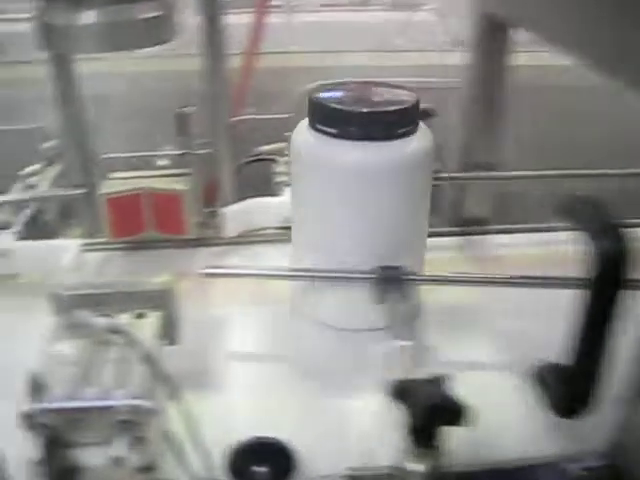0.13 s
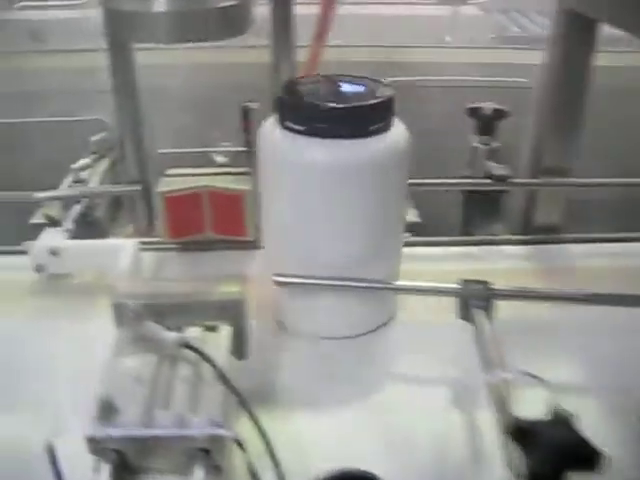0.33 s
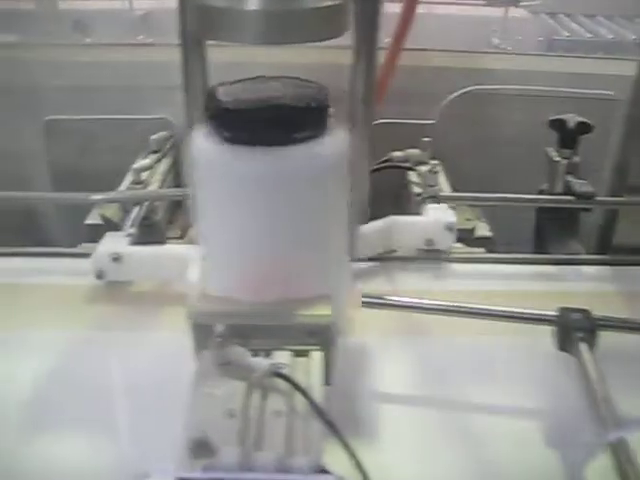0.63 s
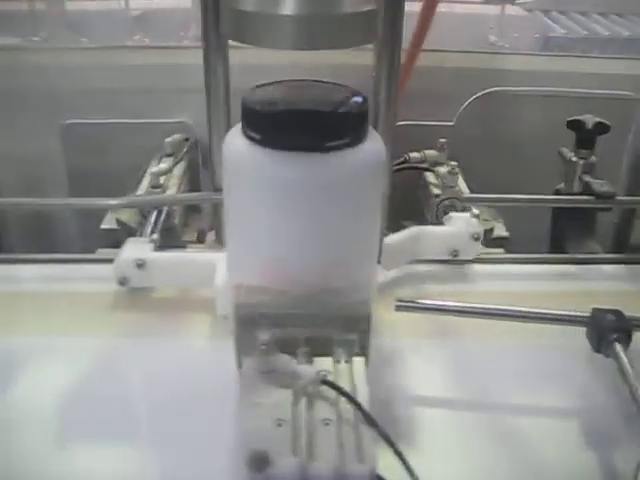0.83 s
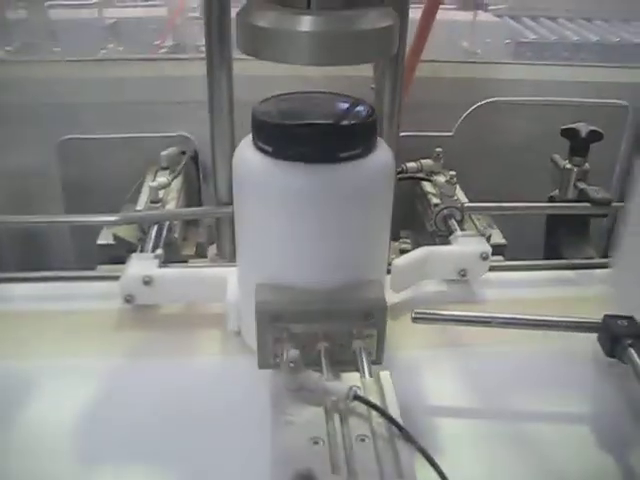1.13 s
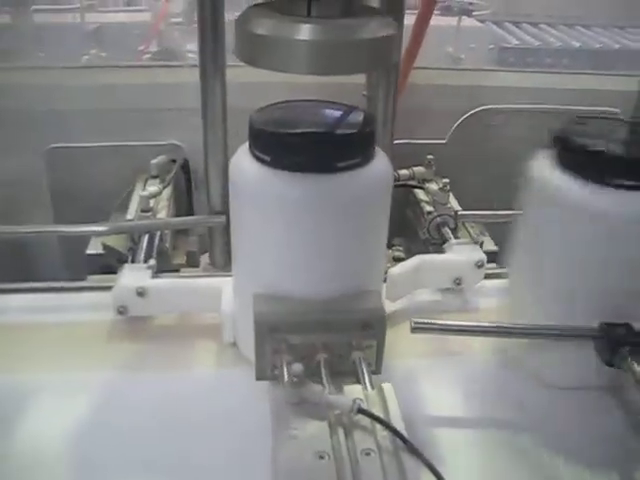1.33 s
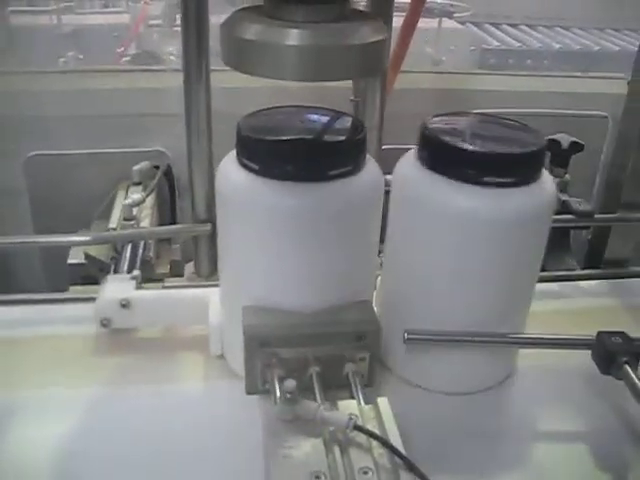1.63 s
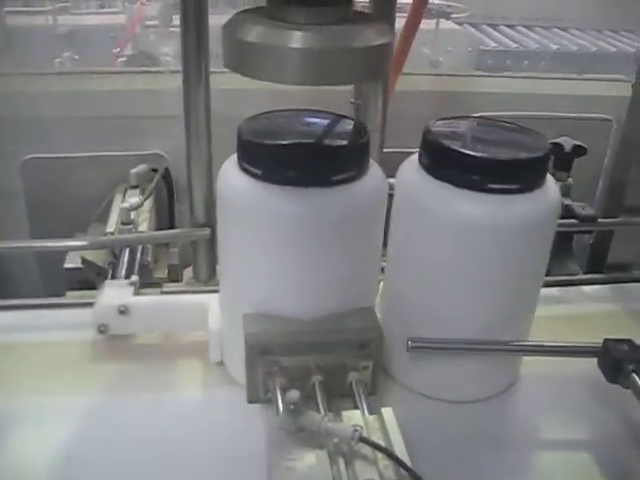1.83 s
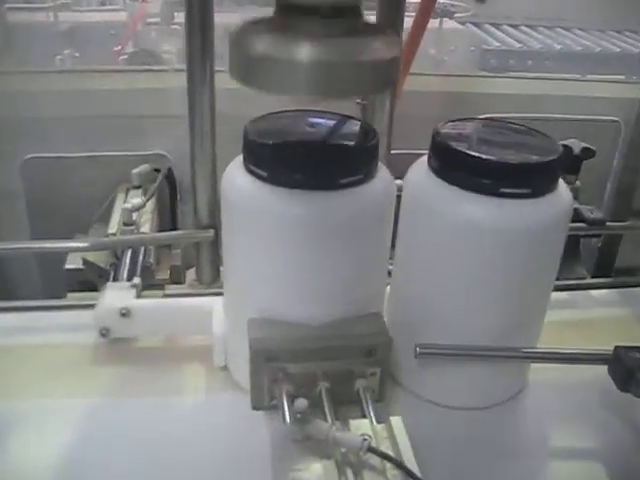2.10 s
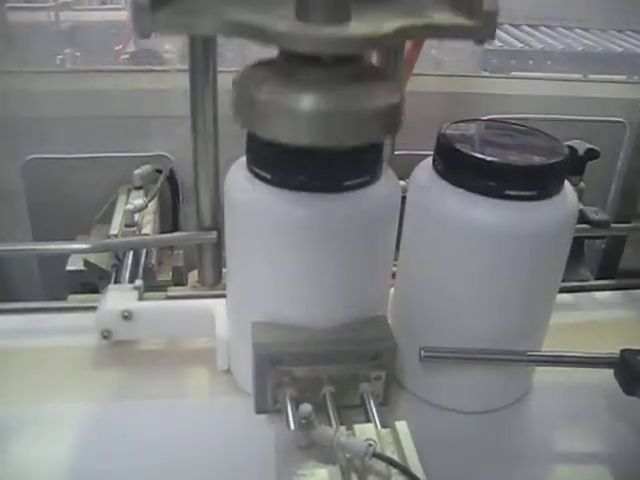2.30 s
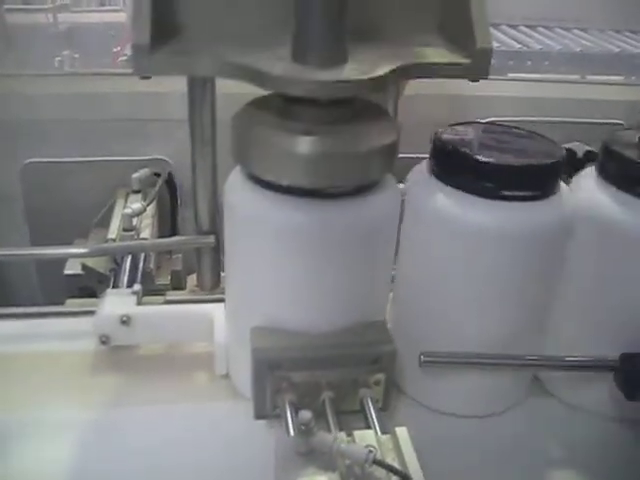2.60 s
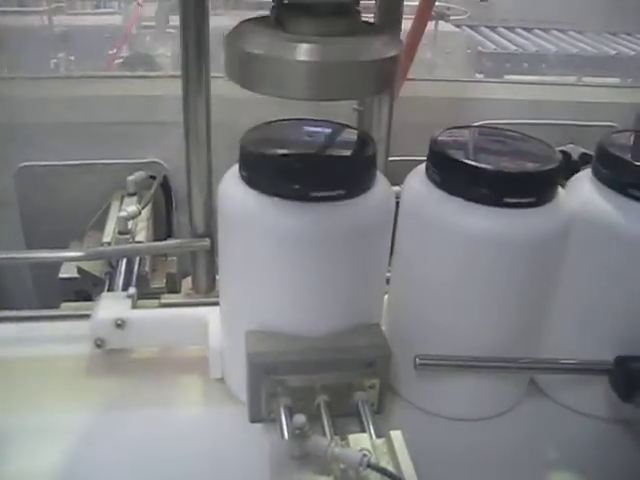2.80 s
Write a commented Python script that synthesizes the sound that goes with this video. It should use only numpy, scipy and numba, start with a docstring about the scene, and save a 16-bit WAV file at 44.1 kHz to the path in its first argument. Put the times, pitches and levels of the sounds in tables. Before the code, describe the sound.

A factory capping machine pops its air valves, whines up to a steady pitch, knocks on a plastic jar lid, grinds down and releases with metal clinks, in a hissing hall, one close camera microphone.

```python
"""In a noisy factory hall, where leaking air hisses throughout, an air-driven capping head closes a jar.
Valves pop as thumps with a spit of air; the vane motor, a stack of sine partials, spins up to a whine.
The head knocks on the lid with ringing modes and grinds it tight, slip pulses ringing the jar and chuck.
The latch clinks, once faintly in the grind and then at the release; the head lifts with a low noise rumble.
One camera microphone with quick gain control and a narrow dead band in its treble hears it all."""
import sys
import numpy as np
from scipy import signal
from scipy.fft import rfft, irfft
from scipy.io import wavfile
from scipy.ndimage import uniform_filter1d
from numba import njit

SR = 44100
rng = np.random.default_rng(int(sys.argv[2]) if len(sys.argv) > 2 else 0)


def waveform_to_disk(signal):
    """Save audio, clipped to [-1, 1], as 16-bit WAV at the path in sys.argv[1]."""
    frames = np.transpose(np.atleast_2d(signal))
    scaled = np.clip(frames, -1, 1) * 32767
    samples = np.round(scaled).astype(np.int16)
    wavfile.write(sys.argv[1], SR, samples)


def level_to_linear(level):
    """Convert decibel levels to linear amplitude factors, elementwise."""
    exponent = np.asarray(level, float) / 20
    return 10 ** exponent


N = 130095  # length in samples

# All levels in the tables are those ahead of the microphone's gain control.
# Hall noise with leaking air. Each row: frequency in Hz, relative level in dB per Hz.
HALL_SPECTRUM = [(25, -17), (60, -16.5), (123, -7.5), (220, -1.5), (350, -4.5), (500, -0.5), (620, -4),
                 (760, 2), (1000, -3.5), (1250, -0.5), (1600, -2), (2600, -2), (5500, -4.5), (7000, -6),
                 (9000, -7), (11500, -2), (13000, -5), (16000, -18.5)]
# Thin wavering whistles. Each row: frequency in Hz, middle level in dB.
WHISTLES = [(2559, -46.5), (8541, -64), (12742, -50)]
# Short faint tones in the hall. Each row: start in seconds, length in seconds, frequency in Hz, level in dB.
PASSING_TONES = [(0.24, 0.18, 750, -32), (1.4, 0.1, 2186, -33.5)]
# Rumble of the lifting head. Each row: time in seconds, level in dB.
LIFT_LEVEL = [(2.74, -60), (2.78, -14), (2.83, -20), (2.88, -19.5), (2.95, -24.5)]
# Colour of that rumble. Each row: frequency in Hz, relative level in dB per Hz.
LIFT_SPECTRUM = [(60, -24), (110, -10), (200, -1), (400, -1), (800, -5), (1500, -11), (4000, -12)]
# Valve pops. Each row: time in seconds, thump level in dB, thump pitch in Hz, spit level in dB,
# spit centre in Hz.
VALVE_POPS = [(0.5165, -9.5, 490, -10, 6700), (0.5204, -8.5, 460, -16.5, 2500),
              (1.518, -8, 378, -9.5, 10500), (1.5187, -9, 450, -12.5, 4000)]
# Head knocks on the lid. Each row: time in seconds, relative level in dB, tilt in dB per octave
# (above zero is brighter).
LID_KNOCKS = [(2.476, -13, 6), (2.4847, 0, 3), (2.5454, -1.5, -6), (2.5505, -1, 6.5), (2.894, -14, 5)]
# Ringing modes of the lid. Each row: middle pitch in Hz, relative level in dB, time to fall 60 dB in seconds.
LID_MODES = [(420, 0, 0.093), (602, -3, .05), (1049.5, 1, 0.041), (1810, -6.5, 0.032), (2780, -6, .03),
             (3630, -11, 0.027)]
# Metal clinks, one faint during the grind, the rest at the release.
# Each row: time in seconds, relative level in dB.
LATCH_CLINKS = [(2.766, -16), (2.7694, -9.5), (2.777, -13.5), (2.821, -19.5), (2.828, -21), (2.607, -20)]
# Ringing modes of the latch. Each row: middle pitch in Hz, relative level in dB, time to fall 60 dB in seconds.
LATCH_MODES = [(3240, -3, 0.048), (3440, -2, .02), (4000, 5.5, 0.019), (4540, -6, .02), (5040, 2, 0.034),
               (6100, -13, 0.017), (6900, -8, 0.039), (8300, -11, 0.031), (10500, -8, .015)]
# Motor under load. Each row: time in seconds, relative level in dB, groan pitch in Hz.
GRIND_PATH = [(2.49, -28, 450), (2.505, -24.5, 408), (2.52, -24, 335), (2.53, -24.5, 428),
              (2.548, -18.5, 480), (2.565, -18, 663), (2.585, -23.5, 693), (2.61, -20.5, 562),
              (2.65, -25.5, 457), (2.68, -22.5, 438), (2.72, -23, 578), (2.745, -24.5, 560),
              (2.77, -26.5, 350), (2.8, -29, 241)]
# Jar and chuck resonances. Each row: centre in Hz, width of the narrower of two filters in Hz,
# relative level in dB.
CHUCK_MODES = [(334, 64, -4.5), (431, 43, -2), (565, 80, 2), (694, 102, -1.5), (1030, 210, -9),
               (1700, 104, -6.5), (1833, 210, -8.5), (2220, 220, -9.5), (3140, 420, -10.5)]
# Free-running motor. Each row: time in seconds, vane pitch in Hz, relative levels of partials 1, 2, 3 and 4 in dB.
MOTOR_PATH = [(1.57, 286.0, -44, -50, -46, -45), (1.584, 336, -51, -29, -49, -44.5),
              (1.628, 516, -44, -36, -31, -41), (1.646, 574, -30, -23, -28.5, -34),
              (1.688, 655.5, -30.5, -31, -36, -36), (1.702, 671, -24.5, -26, -27, -28.5),
              (1.744, 708, -23.5, -35, -25, -45), (1.764, 713, -32.5, -21.5, -22, -49),
              (1.792, 736, -30, -27.5, -22, -35), (1.824, 736.4, -27, -25, -24, -39),
              (1.844, 742.6, -25.5, -19.5, -30, -32), (1.886, 751, -43, -22, -31, -54),
              (1.92, 747.4, -34, -21.5, -34, -42), (1.95, 752, -32.5, -16.5, -37, -40),
              (2.0, 752.6, -32.5, -18, -20.5, -33), (2.04, 753.8, -27, -15.5, -35, -35),
              (2.092, 754.8, -30.5, -17.5, -27, -40), (2.186, 755.9, -22.5, -20.5, -24, -32.5),
              (2.28, 757.4, -24, -20.5, -45, -36), (2.342, 758, -22, -19.5, -24.5, -34),
              (2.408, 756.8, -25, -33, -25.5, -40), (2.46, 756, -26, -34, -27, -32.5),
              (2.468, 751.0, -27, -21, -43, -28), (2.476, 692.5, -30, -33, -23, -57),
              (2.48, 634.4, -19.5, -33, -36, -33), (2.49, 480.3, -31, -11, -46, -28),
              (2.504, 427, -26, -28, -40, -48), (2.52, 342, -9, -28, -32, -36)]
# Upper partials of the motor. Each row: multiple of the vane pitch, relative level at full speed in dB.
UPPER_PARTIALS = [(5, -42), (6, -41.5), (7, -47), (8, -37), (9, -40), (10, -38.5), (11, -42), (12, -41.5),
                  (13, -46), (14, -55), (15, -49), (16, -42), (17, -46), (18, -50), (19, -58), (20, -56)]
# Exhaust air of the motor. Each row: frequency in Hz, relative level in dB per Hz.
EXHAUST_SPECTRUM = [(300, -15), (1000, -10), (2500, -2.5), (5000, -2.5), (9000, -8.5), (15000, -12)]


def time():
    """Seconds of every sample."""
    return np.arange(N) / SR


def curve(table, axis):
    """One column joined by straight lines in time."""
    rows = np.array(table, float)
    return np.interp(time(), rows[:, 0], rows[:, axis])


def gate(on, off, fade):
    """1 between on and off, with ramps just inside both ends."""
    return np.clip((time() - on) / fade, 0, 1) * np.clip((off - time()) / fade, 0, 1)


def level(x, db):
    """Scale to an rms level."""
    return x * level_to_linear(db) / np.sqrt(np.mean(x ** 2))


def walk(rate):
    """Smooth random wandering: levels held 1 / rate s, then averaged twice; spread near 1."""
    hold = int(SR / rate)
    steps = np.repeat(rng.standard_normal(N // hold + 3), hold)
    smooth = uniform_filter1d(uniform_filter1d(steps, hold), hold)
    return 1.204 * smooth[hold:N + hold]


@njit
def svf(x, hz, width):
    """Band-pass with a moving centre, gain 1 there: a two-state resonator stepped sample by sample."""
    y, b, l = np.empty(len(x)), 0., 0.
    for i in range(len(x)):
        g, k = np.tan(np.pi * hz[i] / SR), width / hz[i]
        v = (b + g * (x[i] - l)) / (1 + g * (g + k))
        b, l, y[i] = 2 * v - b, l + 2 * g * v, k * v
    return y


@njit
def follow(x, attack, release, start):
    """Level follower, quick up and slower down."""
    e, out = start, np.empty(len(x))
    for i in range(len(x)):
        e += (x[i] - e) * (attack if x[i] > e else release)
        out[i] = e
    return out


def band(x, hz, width):
    """Band-pass at a fixed or moving centre."""
    return svf(x, hz + np.zeros(N), 1. * width)


def low_cut(x, order, hz):
    """Take away what lies below hz."""
    return signal.sosfilt(signal.butter(order, hz, "high", fs=SR, output="sos"), x)


def noise(spectrum, flicker_db):
    """Coloured noise, rms 1, whose half-octave bands flicker on their own."""
    f, rows = np.maximum(np.arange(N // 2 + 1) * SR / N, 1), np.array(spectrum, float)
    colour_db = np.interp(np.log(f), np.log(rows[:, 0]), rows[:, 1], left=-70, right=-70)
    full = rfft(rng.standard_normal(N)) * level_to_linear(colour_db)
    out = 0
    for step in range(8, 30):
        # overlapping triangles, half an octave apart, that add up to 1
        share = np.clip(1 - np.abs(2 * np.log2(f) - step), 0, 1)
        out = out + irfft(full * share, N) * level_to_linear(flicker_db * walk(8.85))
    return level(out, 0)


def ring(at, hz, db, t60):
    """One struck mode: a sine that builds over a 1.5 ms contact and dies away."""
    late = time() - at
    rise = np.clip(late / 0.0015, 0, 1)
    return rise * level_to_linear(db - 60 * np.abs(late) / t60) * np.sin(2 * np.pi * hz * late)


def crack(at, db, hz, width, t60):
    """A short burst of band-passed noise with a 1.7 ms rise."""
    late = time() - at
    burst = level(band(band(rng.standard_normal(N), hz, width), hz, width), db)
    return burst * np.clip(late / 0.0017, 0, 1) * level_to_linear(-60 * np.abs(late) / t60)


def hall():
    """Leaking air and far machines as flickering noise, with thin wavering whistles and passing tones."""
    # slow swell and faster flutter around -23 dB
    level_db = -23 + 0.07 * walk(3.8) + 0.96 * walk(29.73)
    out = noise(HALL_SPECTRUM, flicker_db=0.67) * level_to_linear(level_db)
    for hz, db in WHISTLES:
        out = out + level_to_linear(db + 3.6 * walk(9.3)) * np.sin(2 * np.pi * hz * time())
    for at, length, hz, db in PASSING_TONES:
        tone = level(band(rng.standard_normal(N), hz, 26), db)
        out = out + tone * gate(at, at + length, 0.052)
    return out


def lift():
    """Low rumble while the head travels up: coloured noise that follows a level curve."""
    rumble = noise(LIFT_SPECTRUM, flicker_db=2.8)
    return rumble * level_to_linear(curve(LIFT_LEVEL, axis=1)) * (time() > LIFT_LEVEL[0][0])


def valve_pops():
    """Each valve gives a brief low thump of pressure, then a spit of air."""
    thump_t60_s, spit_lag_s, spit_t60_s = 0.008, 0.0051, 0.042
    out = np.zeros(N)
    for at, db, hz, spit_db, spit_hz in VALVE_POPS:
        late = time() - at
        # the thump rises twice as fast as it falls
        t60 = np.where(late > 0, thump_t60_s, 0.5 * thump_t60_s)
        out = out - level_to_linear(db - 60 * np.abs(late) / t60) * np.cos(2 * np.pi * hz * late)
        out = out + crack(at + spit_lag_s, spit_db, spit_hz, 0.6 * spit_hz, spit_t60_s)
    return out


def lid_knocks():
    """Each knock rings the lid's modes, slightly different every time, over a burst of gritty noise."""
    out = np.zeros(N)
    for at, db, tilt_db in LID_KNOCKS:
        chance = rng.standard_normal((len(LID_MODES), 2))
        for (hz, mode_db, t60), (u, v) in zip(LID_MODES, chance):
            mode_level_db = db + mode_db - 6.5 + v + tilt_db * np.log2(hz / 1000)
            out = out + ring(at, hz * (1 + 0.021 * u), mode_level_db, t60)
        out = out + crack(at, db - 9, 2100, 7000, t60=0.045)
    return out


def latch_clinks():
    """Each clink rings the latch's small metal modes and adds a bright crack of noise."""
    out = np.zeros(N)
    for at, db in LATCH_CLINKS:
        chance = rng.standard_normal((len(LATCH_MODES), 2))
        for (hz, mode_db, t60), (u, v) in zip(LATCH_MODES, chance):
            out = out + ring(at, hz * (1 + 0.021 * u), db + mode_db + 2.4 * v, t60)
        out = out + crack(at, db - 0.5, 6000, 12000, t60=0.023)
    return out


def grind():
    """Uneven slips of the loaded chuck ring the jar and a wandering groan."""
    rate_hz, scatter, size_db = 160, 0.25, 2.5
    chance, pulses = rng.standard_normal((int(N / SR * 400), 2)), np.zeros(N)
    gaps = np.clip(1 + scatter * chance[:, 0], 0.3, 3)
    at = (np.cumsum(gaps) * SR / rate_hz).astype(int)
    pulses[at[at < N]] = level_to_linear(size_db * chance[at < N, 1])
    push = level(pulses, 0) + 0.83 * rng.standard_normal(N)

    body = np.zeros(N)
    for hz, width, db in CHUCK_MODES:
        mode = band(band(push, hz, width), hz, 2.9 * width)
        body = body + level_to_linear(db) * level(mode, 0)
    body = low_cut(body, 4, 254)

    groan_hz, groan_width_hz = curve(GRIND_PATH, axis=2), 93
    groan = band(band(push, groan_hz, groan_width_hz), groan_hz, groan_width_hz)
    loudness = level_to_linear(11.5 + curve(GRIND_PATH, axis=1))
    return (level(body, -2) + level(groan, -7)) * loudness * gate(GRIND_PATH[0][0], GRIND_PATH[-1][0], 0.013)


def motor():
    """Vane partials, rough at low speed and cleaner near full speed, where upper ones emerge; air pulses per vane."""
    full_speed_hz, motor_db = 774, 8
    exhaust_on_s, exhaust_off_s, exhaust_db = 1.58, 2.48, -24.5
    hz = curve(MOTOR_PATH, axis=1)
    phase = 2 * np.pi * np.cumsum(hz * (1 + 0.00078 * walk(59.6))) / SR  # slight pitch jitter
    # octaves below full speed, counted only until the exhaust stops
    slow = np.log2(full_speed_hz / hz) * (time() < exhaust_off_s)

    tone = np.zeros(N)
    for k in range(1, 5):
        waver_db = 0.73 * walk(24.9)
        # per octave of slowness: 5 dB of roughness and 4 dB of loss
        slow_db = slow * (5 * walk(90) - 4)
        partial_db = curve(MOTOR_PATH, axis=k + 1) + waver_db + slow_db
        tone = tone + level_to_linear(partial_db) * np.sin(k * phase + k)

    fade_db = 61 * np.log2(hz / full_speed_hz)  # 61 dB less per octave below full speed
    for k, db in UPPER_PARTIALS:
        loudness = level_to_linear(db + fade_db + 3.3 * walk(9.1))
        tone = tone + loudness * np.sin(k * phase + rng.uniform(0, 2 * np.pi))
    tone = np.sqrt(2) * level_to_linear(motor_db) * tone * gate(MOTOR_PATH[0][0], MOTOR_PATH[-1][0], 0.013)

    pulse = 1 + 0.35 * np.cos(phase)
    air = noise(EXHAUST_SPECTRUM, flicker_db=1.5) * pulse * gate(exhaust_on_s, exhaust_off_s, 0.1)
    return tone + level_to_linear(exhaust_db + 6.5 * slow) * air  # louder air at low speed


def scene():
    """The near machine with its echo from the hall, over the hall noise; one microphone."""
    hits = low_cut(valve_pops() + lid_knocks() + latch_clinks(), 3, 190)
    near = motor() + grind() + lift() + hits
    room_t60_s, room_db = 0.6, -10
    t = time()[:SR // 2]
    # the echo is fading noise that begins 6 ms after the direct sound
    tail = rng.standard_normal(len(t)) * level_to_linear(-60 * t / room_t60_s) * (t > 0.006)
    tail = tail / np.sqrt(np.sum(tail ** 2))
    echo = signal.fftconvolve(band(near, 1300, 7200), tail)[:N]
    return np.tile(near + level_to_linear(room_db) * echo + hall(), (2, 1))


def top_cut(x):
    """Nothing passes above the cut-off."""
    return signal.sosfilt(signal.butter(12, 16640, fs=SR, output="sos"), x)


def record(dry):
    """A dead band in the treble, then gain control that ducks everything under loud sound."""
    x = dry[0] - band(dry[0], 7830, 1410)  # centre and width of the dead band in Hz
    attack_s, release_s, ratio = 0.0024, 0.07, 3.26
    unity_db = -18  # followed level at which the gain is 1
    size = np.abs(x)
    start = 2 * np.mean(size[:SR // 10])
    heard = follow(size, 1 / (attack_s * SR), 1 / (release_s * SR), start)
    x = x * (level_to_linear(unity_db) / heard) ** (1 - 1 / ratio)
    mix = np.tile(x, (2, 1))
    return top_cut(mix)


dry = scene()
out = record(dry)
waveform_to_disk(out)
```